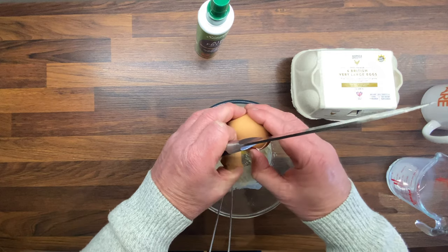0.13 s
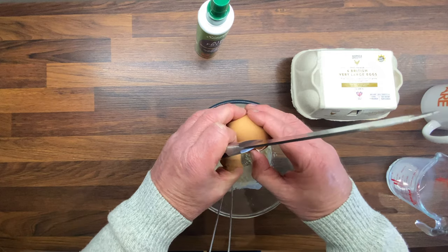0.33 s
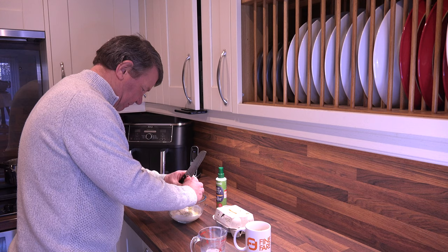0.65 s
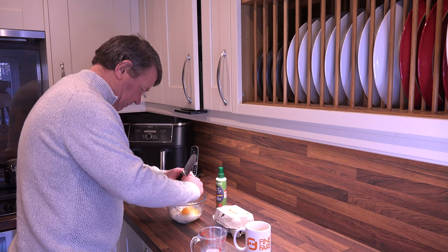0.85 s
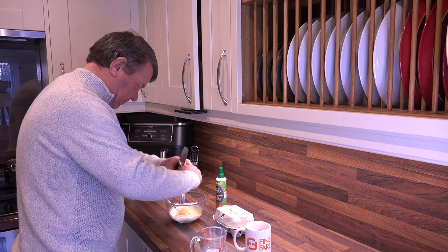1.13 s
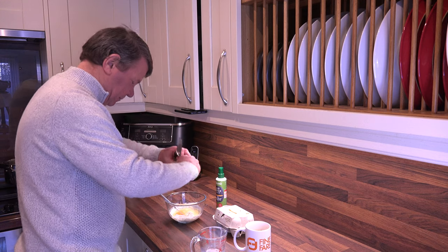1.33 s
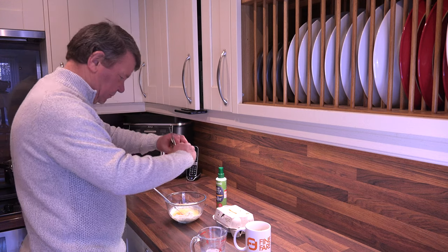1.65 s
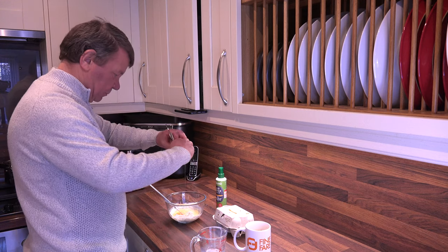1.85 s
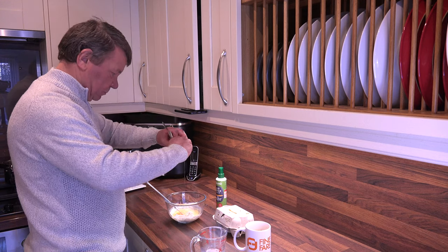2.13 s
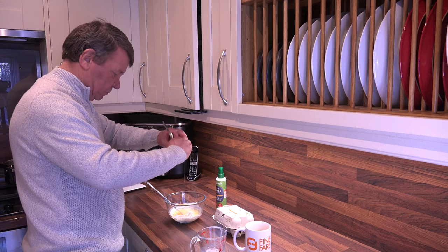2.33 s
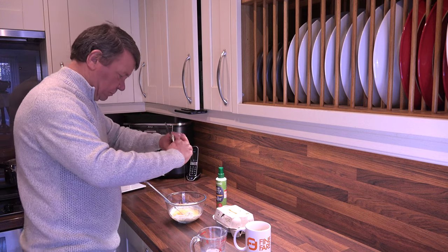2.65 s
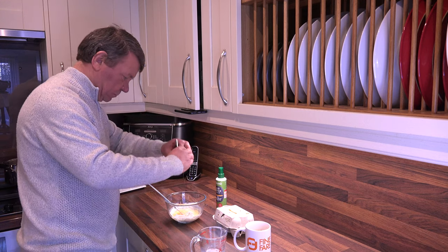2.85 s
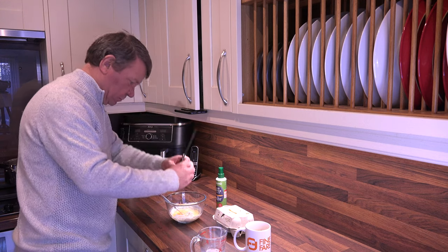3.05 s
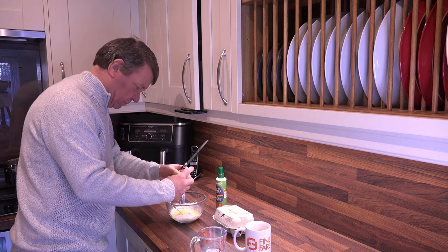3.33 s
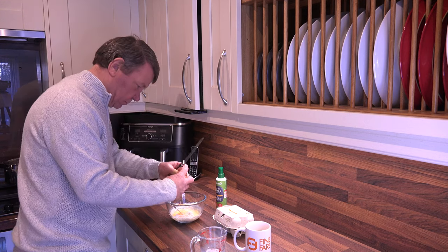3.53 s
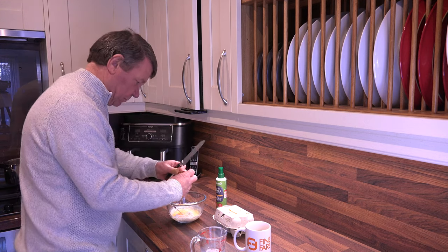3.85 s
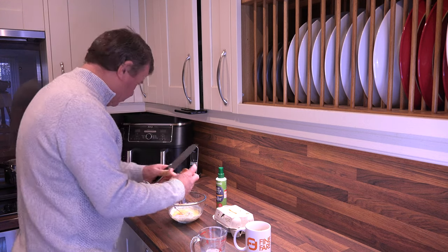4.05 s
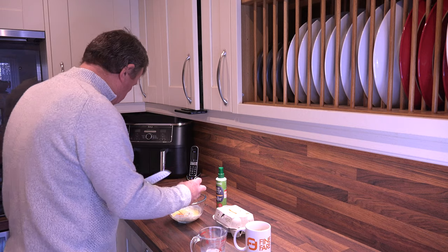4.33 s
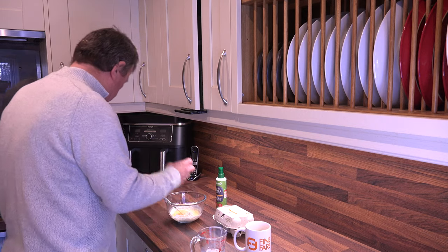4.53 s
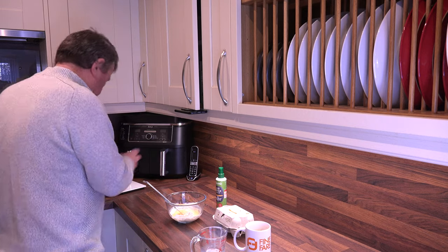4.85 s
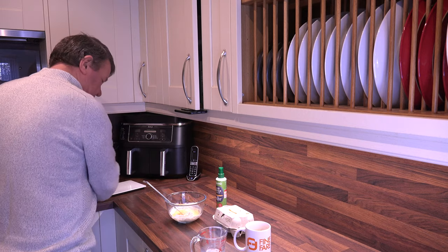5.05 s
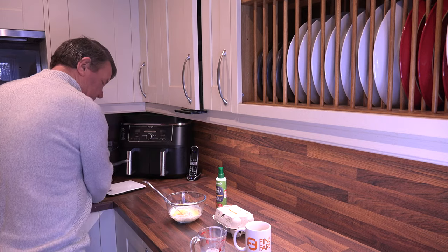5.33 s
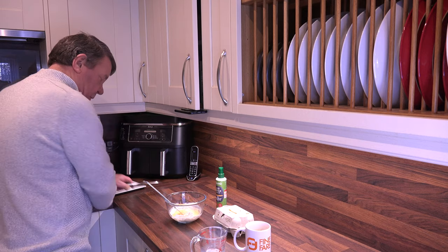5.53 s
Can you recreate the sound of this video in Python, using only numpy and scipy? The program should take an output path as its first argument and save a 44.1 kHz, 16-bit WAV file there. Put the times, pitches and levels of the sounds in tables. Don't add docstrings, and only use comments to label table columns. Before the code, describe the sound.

Close stereo pickup of hands at a kitchen counter: fading bowl ring, quick burst of egg shell cracks with a wet drop, a lull, and a soft knife knock on wood. A very faint motor starts far off. Then dense brittle crunching with a brief steely ring, bright crushes, one hard thud on the board, and scattered rubs and taps over quiet mains hum and hiss.

```python
import sys
import numpy as np
from scipy import signal
from scipy.fft import rfft, irfft, next_fast_len
from scipy.io import wavfile
from scipy.ndimage import uniform_filter1d, map_coordinates

SR = 44100
rng = np.random.default_rng(int(sys.argv[2]) if len(sys.argv) > 2 else 0)


def dump(signal):
    limited = np.clip(np.atleast_2d(signal).T, -1, 1)
    pcm = np.round(limited * 32767).astype(np.int16)
    wavfile.write(sys.argv[1], SR, pcm)


def volts_from_db(level):
    exponent = np.asarray(level, float) / 20
    return 10 ** exponent


N = 250488

# freq_hz, side_re_mid_db
ROOM_SIDE = [(60, -23), (200, -10), (700, -12), (1300, -15.5), (4400, -15.5), (6000, -7.5), (8100, 3),
             (11000, -3), (13000, -18)]


def unit(x):
    return x / np.sqrt(np.mean(x ** 2) + 1e-20)


def top(x):
    return x / np.abs(x).max()


def along(points, hz):
    f, v = np.transpose(points)
    return np.interp(np.log(hz + 1), np.log(f + 1), v)


def wobble(rate, size=N):
    knots = rng.standard_normal(int(size * rate / SR) + 4)
    return map_coordinates(knots, [np.arange(size) * rate / SR])


def filtered(x, response):
    m = next_fast_len(x.shape[-1] + 4096)
    spectrum = rfft(x, m) * response(np.fft.rfftfreq(m, 1 / SR))
    return irfft(spectrum, m)[..., :x.shape[-1]]


def peak(hz, width_hz):
    return lambda f: 1j * f * width_hz / (hz * hz - f * f + 1j * f * width_hz)


def dull(hz):
    return lambda f: 1 / (1 + 1.4j * f / hz - (f / hz) ** 2)


def grit(size, spread_db):
    return unit(rng.standard_normal(size) * volts_from_db(min(spread_db, 5) * rng.standard_normal(size)))


def swells(rows):
    s, db, rise_s, fade_s = np.transpose(rows)[:, :, None]
    late_s = np.arange(N) / SR - s
    return volts_from_db(db + 20 * np.where(late_s < 0, late_s / rise_s, -late_s / fade_s)).max(axis=0)


def add(track, s, x):
    track[round(s * SR):][:len(x)] += x


def shell():
    # start_s, peak_db, plate_ring_db, brightness_db
    large = [(.415, -40, -6, -3), (.5164, -21, -15, -16), (.5331, -18, 4, -6), (.5651, -17, -1.5, 3),
             (.5893, -26, -10, -3), (.6192, -33, 3, -15), (.8337, -43, 13, 1), (.9374, -28, -9, -22),
             (2.155, -50.5, 1, -13), (2.4219, -47.5, 1, -8), (3.026, -42, -1.5, 6), (3.1966, -35, 0.5, -16),
             (3.2474, -36, 3, -27), (3.263, -22, 4, -25), (3.2975, -22, 11, 7), (3.3021, -14, 1.5, -12),
             (3.3284, -22, -16, -19), (3.3896, -21.5, -8, -30), (3.4533, -20.5, -4.5, -27),
             (3.5399, -25, -2, -10), (3.5801, -19.5, 2, -26), (3.7572, -32, -1.5, -20),
             (3.8036, -19, -3, -30), (3.82, -21.5, -25, -25), (3.8343, -28, .5, -27)]
    middle = [
        (.4925, -18.5, -3, 7),
        (.503, -12, -4, -10),
        (.7322, -25.5, -4.5, -23),
        (1.4726, -45.5, -18, -18),
        (2.6814, -48, 3, 5),
        (2.755, -46.5, 2.5, -2),
        (4.2236, -24, -2, 7),
        (4.2871, -23, -18, 5.5),
        (5.2158, -26, -11, -29),
    ]
    small = [(.2784, -45.5, -4, -9), (.454, -29, -1.5, 11), (.4758, -28, 5, 6), (.48, -27.5, 2, 13),
             (.6694, -31, -2, 3), (2.7806, -43.5, -20, -17), (3.0883, -50.5, 5, 13), (3.1468, -33, -4, -14),
             (3.464, -18, -3.5, -29), (3.6323, -24, 1.5, -19), (3.7799, -21, 0.5, -3),
             (3.8526, -21, .5, -27), (4.0997, -52, 7, -18), (4.2328, -25, -8, -5), (4.51, -42, -4, 5)]
    # time_s, hollow_hz
    cavity = [(.28, 1590), (.455, 1400), (.495, 1600), (.517, 2150), (.567, 2050), (.62, 1750), (.67, 1470),
              (.83, 1560), (.94, 1800), (2.16, 2100), (2.42, 1550), (2.78, 1900), (3.12, 1650),
              (3.24, 1730), (3.46, 1620), (3.55, 1880), (3.64, 1680), (5.22, 1150)]
    # peak_s, peak_db, fade_20db_s
    crumble = [(.493, -25, .2), (.57, -25, .07), (.667, -29.5, .045), (2.688, -44, .04), (2.784, -49, .14),
               (3.16, -41, .3), (3.308, -25, .115), (3.468, -29, .06), (3.59, -24, .1), (3.788, -22.5, .11),
               (3.87, -34, .14), (4.32, -27, .12)]
    out, t = np.zeros(N + SR), np.arange(SR // 20) / SR
    for piece_hz, rows in ((3320, large), (4100, middle), (5250, small)):
        for s, db, ring_db, bright_db in rows:
            hollow_hz = np.interp(s, *np.transpose(cavity))
            ring_hz = piece_hz * (1 + .02 * rng.standard_normal())
            run = grit(size=len(t), spread_db=3) * t * np.exp(-t / 0.0036)
            run = run * volts_from_db(3.1 * wobble(470, size=len(t)))
            hollow = .16 * unit(filtered(run, lambda f: peak(hollow_hz, 3000)(f) * (
                peak(hollow_hz, 400)(f) + 0.5 * peak(hollow_hz, 1300)(f) ** 2)))
            plate = .15 * unit(filtered(run, lambda f: dull(11000)(f) * (
                peak(ring_hz, 400)(f) + 0.5 * peak(4800, 4500)(f) ** 2)))
            snap = .125 * unit(filtered(run * np.exp(-t / .012), lambda f: peak(7500, 13000)(f) ** 2))
            fracture = hollow + volts_from_db(ring_db) * plate + volts_from_db(bright_db - .8) * snap
            add(out, s - .002, volts_from_db(db - 0.5) * fracture)
    crumbs = grit(size=N, spread_db=3.5) * volts_from_db(4.1 * wobble(120))
    crumbs = filtered(crumbs, lambda f: (
        1.3 * peak(7300, 11000)(f) ** 2 - 2.4 * peak(1650, 500)(f) ** 2
        + 1.8 * peak(5500, 1200)(f) + 1.1 * peak(2800, 1200)(f)))
    bouts = swells([(s, db, .018, fade_s) for s, db, fade_s in crumble])
    return out[:N] + volts_from_db(-9) * bouts * unit(crumbs)


def squeezes():
    # start_s, peak_db, hollow_hz
    presses = [(0.436, -37, 1300), (0.496, -23, 1610), (0.777, -29, 1530), (0.893, -41.5, 730),
               (0.906, -36, 1550), (3.169, -37, 1480), (3.909, -30, 1470), (3.949, -36, 1720),
               (4.24, -26, 1480), (4.283, -24, 1550), (4.491, -34, 1350), (4.518, -33, 1196),
               (4.548, -40, 1270), (4.574, -38, 1220), (5.23, -26, 1200), (5.255, -26, 1375),
               (5.282, -31, 1380), (5.525, -44, 1300), (5.543, -36, 1600), (5.56, -38, 2000),
               (5.6, -46, 1850)]
    # start_s, peak_db, hollow_hz
    plops = [(.498, -23.5, 703), (.53, -30, 298), (0.535, -26, 700), (.565, -27, 800), (.575, -34, 330),
             (.64, -45, 308), (.79, -38, 560), (.797, -39, 380), (.81, -43, 280), (3.3, -41.5, 824),
             (3.66, -61, 55), (4.21, -39, 280), (4.35, -42, 286), (4.63, -33, 755), (4.85, -47, 278),
             (5.23, -38, 300), (5.27, -41, 330)]
    out, t = np.zeros(N + SR), np.arange(SR // 10) / SR
    for s, db, hollow_hz in [*presses, *plops]:
        run = rng.standard_normal(len(t)) * (t / .004) * np.exp(-t / 0.0035)
        tone = unit(filtered(run, lambda f: peak(hollow_hz, .23 * hollow_hz)(f) ** 2))
        add(out, s - .002, volts_from_db(db - 5.5) * .15 * tone)
    return out[:N]


def rings():
    # start_s, mode_hz, peak_db, t60_s
    touches = [(.02, 4830, -40, 0.2), (.025, 5100, -45, 0.17), (.038, 3246, -44, 0.28),
               (.533, 3265, -32, 0.25), (.535, 5010, -40, 0.082), (.834, 3170, -26.5, 0.027),
               (.845, 3060, -47, 0.083), (3.248, 3300, -35, 0.24), (3.3, 3250, -12.5, 0.033),
               (3.31, 3330, -32, 0.31), (3.8, 1537, -21.5, 0.15), (3.8, 3724, -35, 0.19),
               (4.225, 3730, -28, .04), (4.226, 5200, -24, 0.02), (4.23, 1500, -27, 0.062),
               (4.287, 3950, -31, .04), (4.614, 3500, -33, 0.15), (5.217, 1255, -40, 0.34),
               (5.22, 1403, -39, 0.14)]
    out, t = np.zeros(N + SR), np.arange(SR // 2) / SR
    for s, hz, db, t60 in touches:
        drift_rad = np.cumsum(rng.standard_normal(len(t))) * 0.06
        envelope = volts_from_db(db - 60 * t / t60) * (1 - np.exp(-t / 0.0013))
        add(out, s, envelope * np.sin(2 * np.pi * hz * t + drift_rad))
    return out[:N]


def worktop():
    # start_s, peak_db, boom_db, body_db, edge_db
    knocks = [
        (2.2155, -28.5, -33, -8, -25),
        (2.2263, -25, -41, -18, -26),
        (4.3674, -30, -35, -13, -26),
        (4.6115, -13.5, -26.5, -12, -42),
        (4.9516, -40, -35, -6, -26),
        (5.0648, -36, -40, -13, -28),
        (5.5416, -37, -31, -12, -32),
    ]
    # peak_s, peak_db, swell_20db_s, fade_20db_s
    strokes = [(1.88, -60, .07, .09), (2.054, -54, .075, .09), (2.164, -39.5, .025, .06),
               (2.228, -31.5, .05, .06), (4.132, -42.5, .075, .3), (4.2, -33, .1, .04),
               (4.332, -28, .07, .12), (4.52, -45, .05, .12), (4.8, -53, .1, .4), (4.94, -45, .15, .05),
               (4.954, -36, .03, .08), (5.072, -48, .05, .5), (5.22, -38, .035, .11), (5.6, -53, .2, .9)]
    # freq_hz, level_db
    wood_tone = [(200, -45), (900, 2.5), (1500, -4), (4000, 3.5), (6500, -5), (12000, -59)]
    out, t = np.zeros(N + SR), np.arange(SR // 4) / SR
    for s, db, boom_db, body_db, edge_db in knocks:
        blow = rng.standard_normal(len(t)) * (1.2 * volts_from_db(-60 * t / 0.003) + 0.31 * volts_from_db(-60 * t / 0.16))
        slap = .055 * unit(filtered(blow, lambda f: (peak(3000, 3500)(f) - .5 * peak(1300, 900)(f))
                                    / (1 + 1.2j * f / 4800 - (f / 4800) ** 2) ** 2))
        body = top(filtered(blow, lambda f: peak(280, 60)(f) - peak(620, 220)(f)))
        boom = np.sin(2 * np.pi * 48 * t) + 1.2 * np.sin(2 * np.pi * 135 * t) * volts_from_db(-60 * t / 0.2)
        boom = volts_from_db(-60 * t / 0.39) * boom
        edge = top(filtered(blow, lambda f: peak(9000, 8000)(f) ** 2))
        knock = slap + volts_from_db(body_db) * body + volts_from_db(boom_db + 2) * boom + volts_from_db(edge_db + 8.5) * edge
        add(out, s, volts_from_db(db) * knock)
    grains = grit(size=N, spread_db=2) * volts_from_db(2.7 * wobble(80))
    low = unit(filtered(grains, lambda f: peak(300, 120)(f) - peak(650, 300)(f)))
    high = unit(filtered(grains, lambda f: peak(9000, 8000)(f) ** 2))
    wood = unit(filtered(grains, lambda f: volts_from_db(along(wood_tone, f))))
    return out[:N] + volts_from_db(-5.5) * swells(strokes) * (wood + volts_from_db(-13) * low + volts_from_db(-15) * high)


def bowl():
    # mode_hz, level_db, t60_s
    modes = [(343, -9, 0.74), (944, -0.5, 0.35), (1280, -13, 0.54), (1780, -2, 0.41), (2350, -23, 0.35),
             (3246, -13, .3), (3930, -29, 0.36), (4145, -33, 3.5), (4920, -16, 0.35), (7095, -42, 0.87)]
    t = np.arange(N) / SR
    ring = np.zeros(N)
    for hz, db, t60 in modes:
        drift_rad = np.cumsum(rng.standard_normal(N)) * 0.062
        ring += volts_from_db(db - 60 * t / min(t60, .5)) * np.sin(2 * np.pi * hz * t + drift_rad)
    wash = unit(filtered(rng.standard_normal(N), lambda f: peak(900, 2500)(f) ** 2)) * volts_from_db(-60 * t / 0.57)
    return volts_from_db(-38.5) * ring + volts_from_db(-42.5) * wash


def kitchen(x):
    # freq_hz, t60_s, level_db
    decay = [(150, 0.43, -3), (1500, .45, -0.5), (3500, 0.42, -1), (5980, 0.38, -2), (14100, 0.22, -8.5)]
    hz_at, t60_at, db_at = np.transpose(decay)
    out, step = np.zeros((2, N + SR)), SR // 8
    for start in range(0, N, step):
        hz, t, z = signal.stft(rng.standard_normal((2, SR // 2)), SR, nperseg=256)
        level_db = along(list(zip(hz_at, db_at)), hz)[:, None]
        t60_s = along(list(zip(hz_at, t60_at)), hz)[:, None]
        gain = volts_from_db(level_db - 60 * t / t60_s) * (1 - np.exp(-t / 0.0057))
        tail = signal.istft(z * gain, SR, nperseg=256)[1]
        wet = signal.fftconvolve(x[None, start:start + step], tail, axes=1)
        out[:, start:][:, :wet.shape[1]] += wet[:, :N + SR - start]
    mid = out[0, :N]
    side = filtered(out[1, :N], lambda f: volts_from_db(along(ROOM_SIDE, f)))
    return np.array([mid + side, mid - side])


def motor():
    # mode_hz, width_hz, level_db
    casing_modes = [(539, 30.5, -4), (699, 32, -2), (1090, 163, -6.5)]
    shaft_hz, first_turn_s = 25.21, 2.509
    load = swells([(2.45, -63.5, .055, 60)])
    turns = (np.arange(N) / SR - first_turn_s) * shaft_hz
    knock = np.diff(np.floor(turns), prepend=0) * volts_from_db(1.5 * wobble(20))
    rattle = knock + .04 * rng.standard_normal(N) * np.exp(-(turns % 1) / .3)

    def casing(f):
        modes = sum((-1) ** k * volts_from_db(db) * peak(hz, width_hz)(f)
                    for k, (hz, width_hz, db) in enumerate(casing_modes))
        return modes / (1 + 1j * f / 1400) ** 2

    return load * unit(filtered(rattle * (turns > -3), casing))


def air():
    # freq_hz, density_db_per_hz
    hiss = [(12, -42), (20, -22), (68, -7.5), (101, -0.5), (127, -11), (204, -4), (255, -14), (293, -9.5),
            (527, -17.5), (825, -8.5), (1290, -15.5), (1480, -13), (3840, -21.5), (7950, -22), (16000, -27)]
    # freq_hz, side_re_mid_db
    hiss_side = [(60, -17.5), (200, -8), (380, -4), (1200, -7), (2300, -13.5), (4400, -17.5), (5600, -2.5),
                 (8000, 1), (12500, -3), (14500, -11)]
    # freq_hz, rms_db
    mains = [(50, -74.5), (100, -69), (200, -77)]
    t = np.arange(N) / SR
    noise = rng.standard_normal((2, N))
    mid, side = filtered(noise, lambda f: volts_from_db(along(hiss, f) + [0 * f, along(hiss_side, f)]))
    gain = volts_from_db(-58.53 + 0.42 * wobble(13)) / np.std(mid)
    hum = np.zeros(N)
    for hz, db in mains:
        hum += volts_from_db(db + 3 + 1.5 * wobble(25)) * np.sin(2 * np.pi * hz * t + .5 * wobble(15))
    return gain * np.array([mid + side, mid - side]) + hum


def scene():
    work = shell() + squeezes() + rings() + worktop()
    lead = volts_from_db(-5) * filtered(work, lambda f: 1j * volts_from_db(along(ROOM_SIDE, f)))
    direct = volts_from_db(-0.5) * np.array([work + lead, work - lead])
    return direct + volts_from_db(-29.5) * kitchen(work) + bowl() + motor() + air()


def top_cut(x):
    return signal.sosfilt(signal.butter(12, 16310, fs=SR, output="sos"), x)


def record(dry):
    # freq_hz, left_re_right_db
    lean = [(40, 0), (130, -4.5), (280, -2), (600, 2.5), (1200, 0)]
    left, right = filtered(dry, lambda f: volts_from_db(along(lean, f) * [[.5], [-.5]]) * (f < 15830))
    hz, _, z = signal.stft([left + right, left - right], SR, nperseg=2048)
    mid_power, side_power = uniform_filter1d(np.abs(z) ** 2, size=16, axis=1)
    z[1] *= (side_power > mid_power * volts_from_db(-19)) | (hz < 900)[:, None]
    mid, side = signal.istft(z, SR, nperseg=2048)[1][:, :N] / 2
    return top_cut(np.array([mid + side, mid - side]))


dry = scene()
out = record(dry)
dump(out)
```